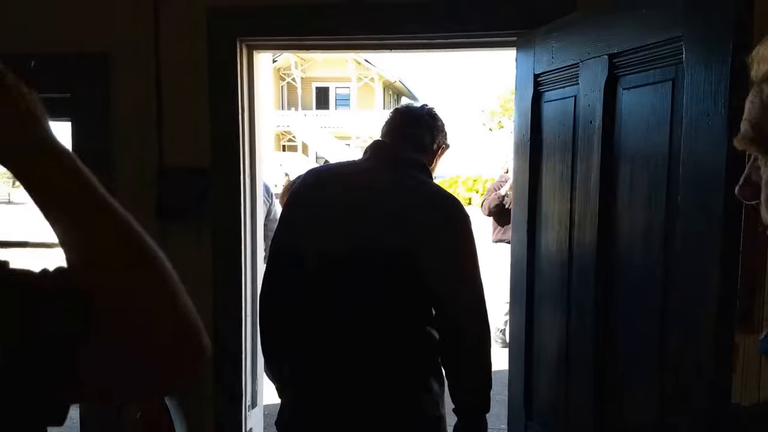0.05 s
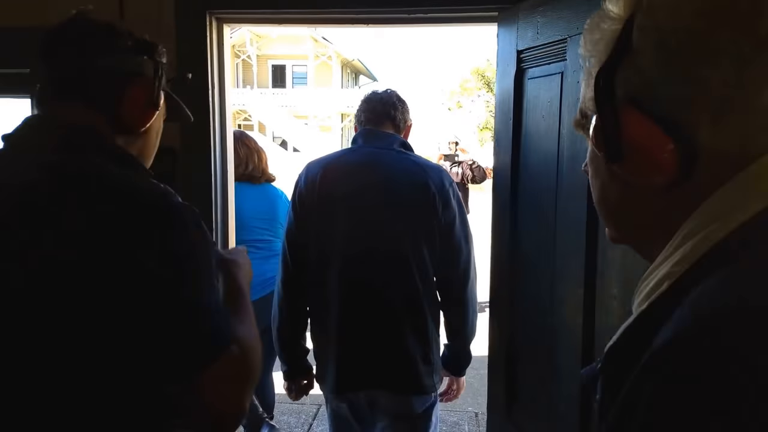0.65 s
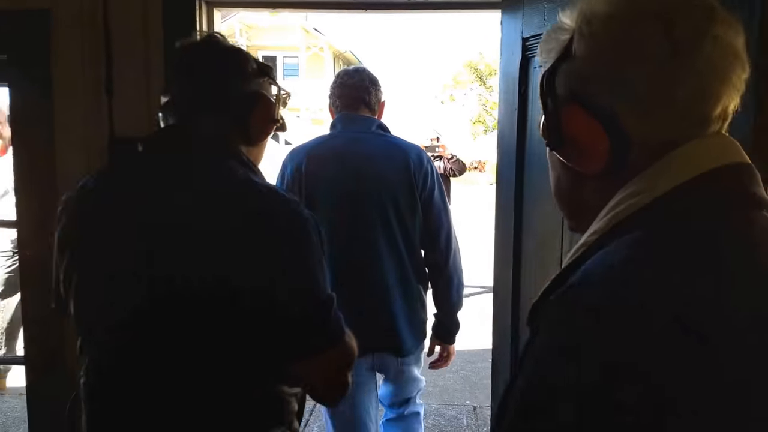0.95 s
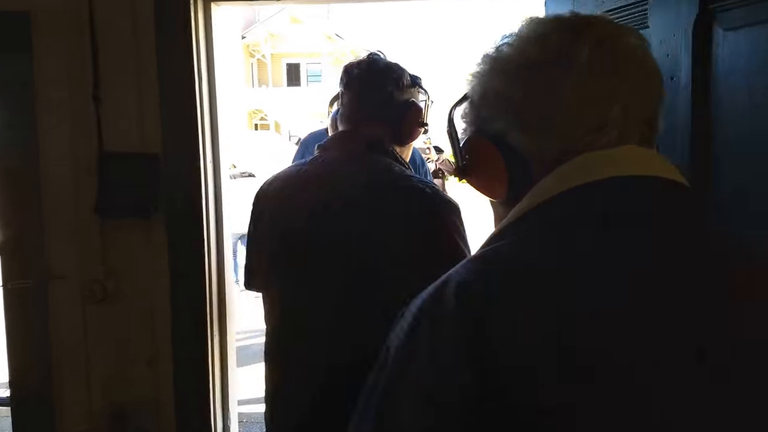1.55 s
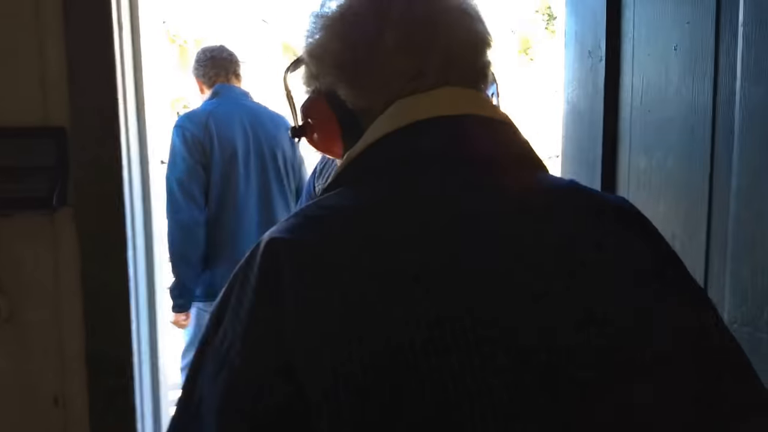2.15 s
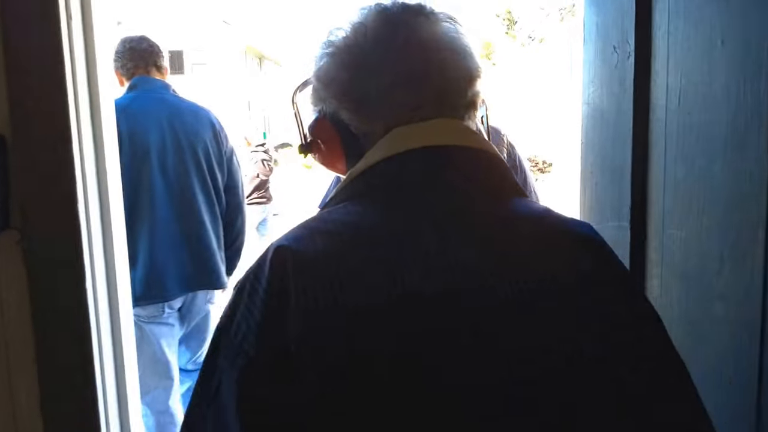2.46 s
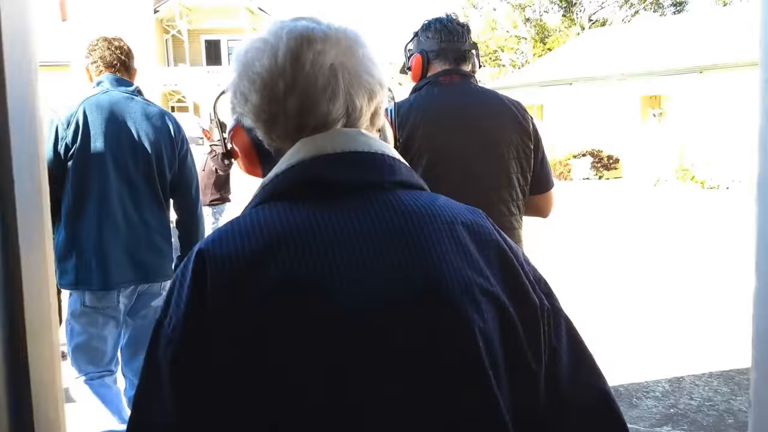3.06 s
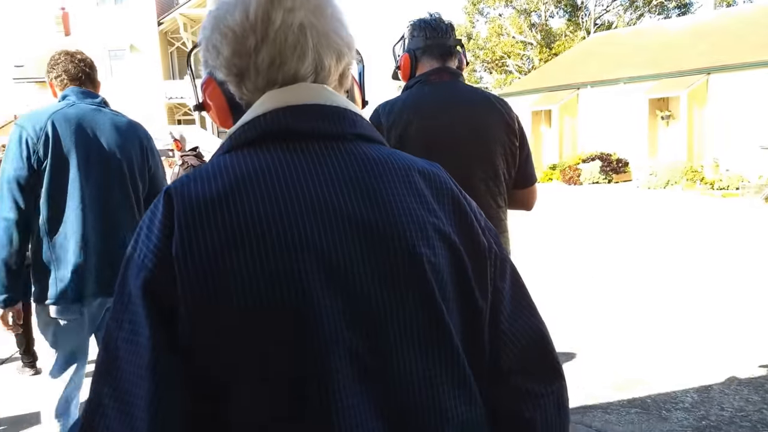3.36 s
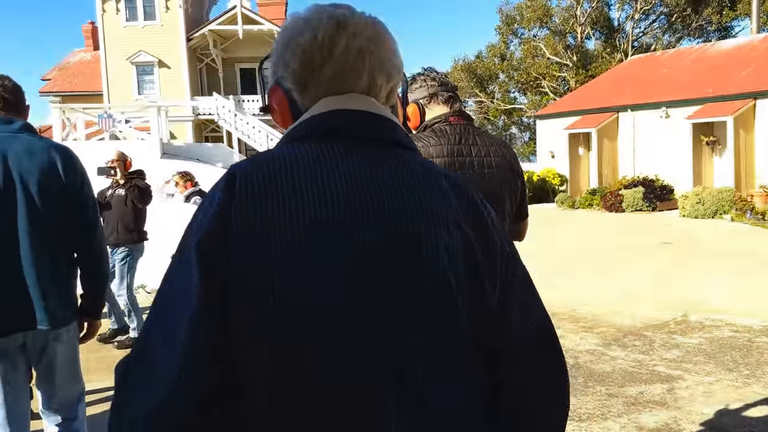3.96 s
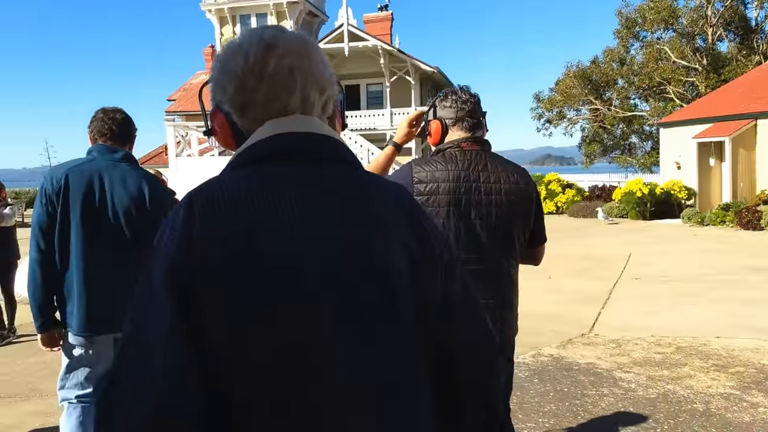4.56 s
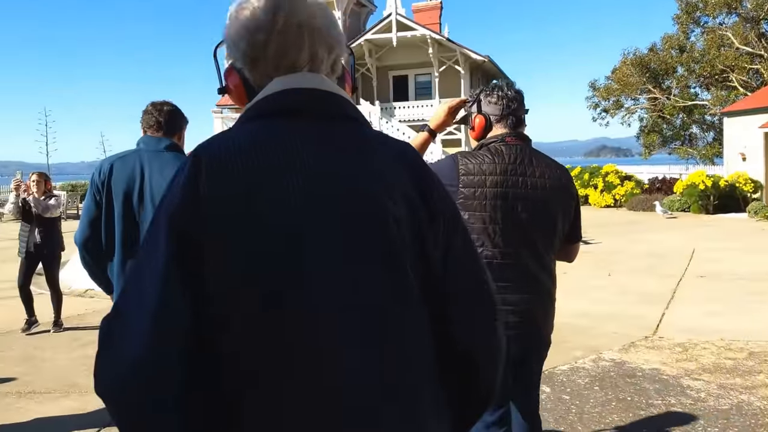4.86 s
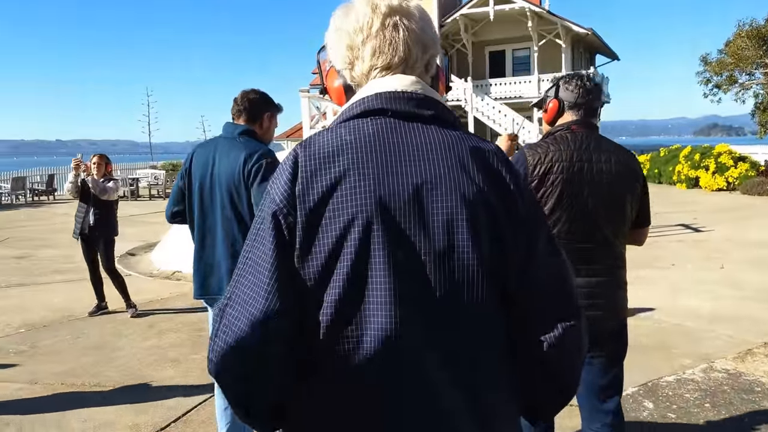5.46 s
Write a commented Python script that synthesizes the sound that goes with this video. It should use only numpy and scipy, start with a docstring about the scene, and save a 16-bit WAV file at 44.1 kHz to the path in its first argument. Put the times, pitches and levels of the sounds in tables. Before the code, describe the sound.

Loud, low compressor thumps and puffs of air pulse over an engine's drone, growing duller on the way out of an engine house.

```python
"""A slow air compressor thumps in an engine house, driven by a roaring diesel engine.
Its piston pushes and pulls, and each stroke sets the pipes and the building booming.
The engine's four cylinders hum and clatter; its bass swells under the load of every stroke.
Once a turn air hisses through the valves, at times with a ringing spit, and the pipes knock.
The listener walks from the room through the door into the yard, where the treble fades."""
import sys
import numpy as np
from scipy import signal
from scipy.fft import rfft, irfft, next_fast_len
from scipy.io import wavfile
from scipy.ndimage import uniform_filter1d

SR = 44100
rng = np.random.default_rng(int(sys.argv[2]) if len(sys.argv) > 2 else 0)


def transcribe(u):
    """Save the signal u as a 16-bit wav file named by the first command-line argument.

    u: samples, shape (n,) or (channels, n), limited to [-1, 1]; the rate is SR.
    q: integer samples, one column per channel.
    """
    v = np.clip(np.atleast_2d(u).T, -1, 1)
    q = np.round(v * 32767).astype(np.int16)
    wavfile.write(sys.argv[1], SR, q)


N = 247401
TIME = np.arange(N) / SR
TURN_S = 0.20775   # one turn of the compressor
CYCLE_HZ, CYLINDERS = 9.425, 4   # each cylinder fires once in an engine cycle


# the piston's push and pull: (time into the turn [s], level [dB])
PISTON_STROKES = [(0.0544, 2.5), (0.163, 1.5)]
# notes at which the pipes and building ring; narrow ones ring longest: (pitch [Hz], width [Hz],
# indoor level [dB], outdoor level [dB], travel time to the listener [s], its change on the walk [s/s])
RESONANCES = [(58, 21, -25.7, -39, 0.0111, .0015), (66.4, 11.2, -27.9, -33.5, 0.0104, .001),
              (79.8, 33, -25.5, -28.7, 0.0141, -.0014), (102.2, 2.8, -28, -41, .0196, .0001),
              (118.4, 4.4, -24.3, -20.3, 0.0054, -.0003), (127, 17, -22, -23, 0.01043, 0),
              (137, 7.3, -25, -32, 0.00932, .0003), (171.6, 10, -30.3, -37, .0164, 0.0049),
              (177.5, 2.9, -35.9, -42, .0413, -.0002), (224.8, 6.2, -26, -28.5, 0.00881, .0001),
              (236, 4.14, -31, -25, 0.00975, 0), (246, 2.12, -25, -37.5, 0.01062, .0001),
              (255.2, 4.1, -33, -27.5, 0.01064, .0002), (317.4, 3, -39.5, -37, .0165, -.0002),
              (442.6, 3.8, -41, -24, .0376, 0), (462.6, 6, -41, -24.5, .0014, 0),
              (348.5, 11, -34.5, -36, 0.0151, 0)]
# strength of the thumps along the walk: (time [s], level [dB])
THUMP_LEVELS = [(0, -0.5), (0.8, 0), (1.75, 0), (2.7, 0.2), (4, 0), (5.6, -1.8)]

def thumps(treble_db, uneven_db=0.5, shade_from_hz=235, shade_per_octave=0.73):
    """Piston strokes ring the pipes and the building; the mix of notes changes at the door."""
    level_db, = in_time(THUMP_LEVELS)
    run_in = round(4 * TURN_S * SR)   # the machine is already running at the start
    pushes, out = np.zeros(N + run_in), np.zeros((2, N))
    for (s, db), sign in zip(PISTON_STROKES, (1, -1)):
        at = (np.arange(s, len(pushes) / SR, TURN_S) * SR).astype(int)
        pushes[at] = sign * from_db(db + uneven_db * rng.standard_normal(64)[:len(at)])
    for k, (hz, width, indoor_db, outdoor_db, travel_s, growth) in enumerate(RESONANCES):
        r, w = np.exp(-np.pi * width / SR), 2 * np.pi * hz / SR
        ring = signal.lfilter([1, -r * np.cos(w)], [1, -2 * r * np.cos(w), r * r], pushes)
        # each note reaches the walking listener by its own path
        late_s = travel_s + growth * TIME
        ring = np.interp(TIME - late_s, np.arange(-run_in, N) / SR, ring)
        outside = outdoors(lead_s=0.25 if hz > 200 else 0)   # higher notes change sooner
        place_db = indoor_db + (outdoor_db - indoor_db) * outside
        shade_db = treble_db * shade_per_octave * max(np.log2(hz / shade_from_hz), 0)
        ring = ring * (-1) ** k * from_db(place_db + shade_db + level_db)
        # each note meets the two microphones a little differently
        lean_db = 1.4 * drift(0.88)
        right = np.interp(TIME - 0.0004, TIME, ring)
        out += [ring * from_db(lean_db), right * from_db(-lean_db)]
    return above(below(out, 800), 50, order=4)   # air pulses are soft-edged


# the engine's strongest tones: (pitch [multiples of the firing rate])
HUM_MULTIPLES = [3, 4, 5, 9, 10, 12, 20, 22]
# each tone forms a standing wave, a fixed pattern of loud and quiet spots: (level at one loud spot [dB],
# time it is passed [s], time between loud spots [s], fade away from it [dB/s])
HUM_SPOTS = [(-35, 5.0, 33, 0.6), (-31, 3.3, 3.14, -0.5), (-34, 4.72, 2.5, 2), (-34.5, 1.06, 2.1, 1.5),
             (-31, 3.12, 2.9, 4.5), (-30.5, 2.1, 1.62, 5), (-36, 0.87, 1.39, 1.5), (-36, 0.75, 1.5, 5)]

def hum(dip_depth=0.66, rough_db=2.5, jitter_s=0.000061, spread_rad=0.57):
    """Engine tones, rough from uneven burning, swell and fade as the listener walks through them."""
    out, time = np.zeros((2, N)), TIME + jitter_s * drift(22)
    for multiple, (db, loud_s, spacing_s, fade_db_per_s) in zip(HUM_MULTIPLES, HUM_SPOTS):
        away_s = abs(TIME - loud_s)
        standing = 1 - dip_depth * np.sin(np.pi * away_s / spacing_s) ** 2
        phase = 2 * np.pi * (multiple * CYLINDERS * CYCLE_HZ * time + rng.random())
        stereo_shift = spread_rad * drift(1.0) * [[.5], [-.5]]
        gain = from_db(db - fade_db_per_s * away_s + rough_db * drift(30))
        out += np.sqrt(2) * standing * gain * np.sin(phase + stereo_shift)
    return out


# tone colour of the firing cylinders: (pitch [Hz], level [dB per Hz])
FIRING_COLOUR = [(115, -53), (165, -54), (200, -52.5), (280, -66), (340, -56), (420, -60), (480, -56.5),
                 (550, -60), (780, -58.5), (1050, -60.5), (1500, -55), (2000, -81), (4000, -104)]

def firing(odd_db=-2, firing_db=1, wobble_s=0.00012, patterns=8):
    """The cylinders repeat one echoing cycle, whose pattern changes along the walk."""
    size = round(SR / CYCLE_HZ)
    harmonic = np.arange(size // 2 + 1)
    stress = from_db(odd_db * (harmonic % 2) + firing_db * (harmonic % CYLINDERS == 0))
    stress[CYLINDERS * np.array(HUM_MULTIPLES)] = 0   # hum() plays these tones
    position = (TIME + wobble_s * drift(3.03)) * CYCLE_HZ * size % size
    walked = TIME / TIME[-1] * (patterns - 1)
    out = np.zeros((2, N))
    for step in range(patterns):
        cycle = irfft(diffuse(FIRING_COLOUR, size) * stress, size)
        nearness = np.sqrt(np.maximum(1 - abs(walked - step), 0))
        out += nearness * np.array([np.interp(position, np.arange(size), side) for side in cycle])
    return above(out, 140)


# tone colour of the engine's roar: (pitch [Hz], level [dB per Hz])
ROAR_COLOUR = [(120, -52), (160, -54), (200, -51.5), (290, -60.5), (400, -58.5), (540, -62), (680, -55.5),
               (900, -60.5), (1450, -58.5), (1900, -69.5), (2300, -68.5), (2850, -62), (3600, -76.5),
               (5000, -99)]

def roar(throb_depth=0.056):
    """Burning fuel and gears make a noise that throbs a little at each firing."""
    throb = 1 + throb_depth * np.cos(2 * np.pi * CYLINDERS * CYCLE_HZ * TIME)
    return above(noise(ROAR_COLOUR) * throb, 150)


# the engine along the walk: (time [s], level of the middle notes [dB], level of the high clatter [dB])
ENGINE_LEVELS = [(0, 3, 0), (0.8, 3.5, 0.6), (1.35, 1, 0.6), (1.7, 3, -2.5), (2.2, 2, 0), (2.65, 5, 1.5),
                 (3.3, -0.5, -1), (4.1, 3, -2.5), (4.8, 4, -4), (5.6, 3.5, -8)]

def through_door(x, bass_db=0.5, bass_hz=270, clatter_hz=620):
    """Bass bends round the door frame at a steady level, while higher notes are partly blocked."""
    middle_db, clatter_db = in_time(ENGINE_LEVELS)
    bass, low = below(x, bass_hz), below(x, clatter_hz)
    return bass * from_db(bass_db) + (low - bass) * from_db(middle_db) + (x - low) * from_db(clatter_db)


def under_load(x, deep_depth=0.5, upper_depth=0.072, indoor_peak_s=0.098, outdoor_peak_s=0.077):
    """Each piston stroke loads the engine, so its bass swells and sinks; the upper bass follows late."""
    peak_s = indoor_peak_s + (outdoor_peak_s - indoor_peak_s) * outdoors()
    stroke_hz = len(PISTON_STROKES) / TURN_S
    load, late_load = (np.cos(2 * np.pi * stroke_hz * (TIME - peak_s - lag_s)) for lag_s in (0, 0.025))
    deep = below(x, 160)
    upper = below(x, 290) - deep
    return x + deep * deep_depth * load + upper * upper_depth * late_load


# one puff of air each turn: (time of the peak [s], hiss level [dB], chuff level [dB])
PUFFS = [(-0.146, 0, 2), (0.06, 0.6, 1.5), (0.267, 0, 2), (0.476, 1.7, -3), (0.681, -0.2, 3.5),
         (0.889, 0.2, 3), (1.098, -1, 1), (1.308, -1, -12), (1.511, -0.2, 5.5), (1.72, -2.5, -10),
         (1.929, -0.4, 4), (2.139, -2, -7), (2.348, -1.5, 5), (2.554, -0.5, 6), (2.756, -1, -1),
         (2.965, 1, 8), (3.174, 0.6, 5.5), (3.385, 0.6, 3.5), (3.587, -1, 1), (3.797, -0.8, 4.5),
         (4.009, -0.5, -0.5), (4.213, -0.5, 1), (4.42, -0.7, 3.5), (4.638, -0.5, -16), (4.835, -0.5, -6),
         (5.049, 0, -4), (5.261, -1.3, -7), (5.467, -0.5, -0.5)]
# tone colours of the valves' hiss and the air pipe's chuff: (pitch [Hz], level [dB per Hz])
HISS_COLOUR = [(600, -66.5), (1400, -66.5), (2100, -59.5), (2800, -59.5), (3600, -59), (5000, -64.5),
               (6500, -64), (8000, -70.5), (11000, -73.5), (15000, -78.5)]
CHUFF_COLOUR = [(400, -72), (590, -64), (675, -58.5), (780, -66), (950, -65), (1150, -59.5), (1450, -61.5),
                (1900, -71.5), (3000, -93.5)]

def valves(treble_db, hiss_db=1.17, chuff_db=-0.5):
    """Each puff is a bright, sputtering hiss over a hollow chuff of the air pipe."""
    times_s, hisses_db, chuffs_db = np.transpose(PUFFS)
    flow = np.sqrt(puff_power(times_s, hisses_db) + spit_power(swell_s=0.0052, decay_s=0.013))
    flow *= from_db(0.73 * drift(45))   # sputter
    hiss = noise(HISS_COLOUR) * flow * from_db(hiss_db + treble_db + 0.5 * drift(150))
    # the air swallows the highest part of each tail first
    swell = flow ** 2 / np.mean(flow ** 2)
    dull = below(hiss, 9000)
    hiss = dull + (hiss - dull) * (swell / 2) ** 0.16
    pipe_flow = np.sqrt(puff_power(times_s, chuffs_db))
    chuff = noise(CHUFF_COLOUR) * pipe_flow * from_db(chuff_db + 2.5 * drift(60))
    return hiss + chuff


def puff_power(times_s, levels_db, swell_s=0.038, decay_s=0.089):
    """Each puff of air swells and dies away in the room; the tails overlap."""
    return sum((from_db(db) * burst(s, swell_s, decay_s, tail_shape=1.45)) ** 2
               for s, db in zip(times_s, levels_db))


# short spits of air: (time [s], level [dB])
AIR_SPITS = [(0.885, -8), (0.915, -3), (1.11, -2), (1.935, -6), (2.155, -2), (2.36, 0), (2.77, -5),
             (3.195, 0), (3.592, 1), (3.805, -1), (4.22, -5)]

def spit_power(swell_s, decay_s):
    """Some puffs break out with a sudden spit of air."""
    return sum((from_db(db) * burst(s, swell_s, decay_s)) ** 2 for s, db in AIR_SPITS)


# tone colour of the ringing valve plates: (pitch [Hz], level [dB per Hz])
PLATE_COLOUR = [(2600, -125), (3200, -70), (3290, -53), (3380, -67), (3560, -56), (3700, -63), (3850, -59),
                (4600, -125)]

def valve_plates(treble_db):
    """Each spit of air sets the valve plates rasping, with a metallic ring."""
    ringing = np.sqrt(spit_power(swell_s=0.02, decay_s=0.07))
    return noise(PLATE_COLOUR) * ringing * from_db(0.6 * treble_db)


# hollow knocks in the pipes: (time [s], pitch [Hz], level [dB])
PIPE_KNOCKS = [(0.08, 662, -24), (0.277, 668, -22.5), (0.651, 670, -28), (1.07, 664, -29),
               (1.305, 674, -26), (2.55, 660, -28), (2.675, 690, -26), (2.95, 370, -23), (2.985, 650, -28),
               (3.176, 673, -31), (3.495, 390, -23.5), (3.784, 676, -27), (4.485, 390, -25),
               (5.075, 670, -29)]

def knocks(width_hz=35, swell_s=0.018, decay_s=0.034, rattle_db=-7):
    """A short rattle rings a hollow note in the pipes, blurred by the room."""
    out, r = np.zeros(N), np.exp(-np.pi * width_hz / SR)
    for s, hz, db in PIPE_KNOCKS:
        rattle = rng.standard_normal(N)
        ring = signal.lfilter([1, 0, -1], [1, -2 * r * np.cos(2 * np.pi * hz / SR), r * r], rattle)
        ring /= np.sqrt(uniform_filter1d(ring ** 2, size=1500) + 1e-9)   # evened, so every knock rings
        out += ring * burst(s, swell_s, decay_s) * from_db(db)
    dull = below(out, 1070)
    return dull + (out - dull) * from_db(rattle_db)


# tone colour of the rushing air: (pitch [Hz], level [dB per Hz])
RUSH_COLOUR = [(1000, -76), (1800, -60), (2600, -63.5), (3500, -63.5), (5000, -69), (6500, -70.5),
               (8000, -78), (11000, -83.5), (15000, -101)]

def air_rush(treble_db):
    """An unbroken rush of air lies behind the puffs and fades in the yard."""
    return noise(RUSH_COLOUR) * from_db(0.95 * treble_db)


# tone colour of the building's rumble: (pitch [Hz], level [dB per Hz])
RUMBLE_COLOUR = [(20, -100), (45, -75), (85, -68), (120, -60), (160, -62), (250, -87), (600, -140)]

def rumble():
    """The building rumbles faintly under everything."""
    return noise(RUMBLE_COLOUR)


# how alike the two microphones hear the room: (pitch [Hz], likeness [-1 opposite to 1 same])
STEREO_LIKENESS = [(30, -0.45), (70, -0.095), (150, 0.023), (300, 0.74), (600, 0.73), (1100, 0.49),
                   (1600, -0.29), (15000, 0.022)]

def diffuse(colour, size):
    """Random stereo spectrum of an echoing sound that repeats after `size` samples."""
    hz = np.arange(size // 2 + 1) * SR / size
    mid, side = rfft(rng.standard_normal((2, size)))
    alike = np.clip(at_hz(STEREO_LIKENESS, hz), -1, 1)
    pair = np.sqrt(1 + alike) * mid + np.sqrt(1 - alike) * side * [[1], [-1]]
    return pair * from_db(at_hz(colour, hz)) * np.sqrt(SR) / 2


def noise(colour):
    """Steady stereo noise of a given tone colour."""
    size = next_fast_len(N)
    return irfft(diffuse(colour, size), size)[:, :N]


def outdoors(lead_s=0, door_s=2.91, passage_s=0.5):
    """Goes from 0 in the engine house to 1 in the yard."""
    return np.clip((TIME + lead_s - door_s) / passage_s + .5, 0, 1)


def burst(s, swell_s, decay_s, tail_shape=1):
    """Swells to 1 at time s and dies away; a tail shape above 1 cuts the tail shorter."""
    before, after = np.maximum(s - TIME, 0), np.maximum(TIME - s, 0)
    fall = (before / swell_s) ** 2 + (after / decay_s) ** tail_shape
    return np.exp(-np.minimum(fall, 20))


def drift(rate):
    """A random wander of about 1 either way, with `rate` new values a second."""
    knots = rng.standard_normal(4096)
    return np.interp(TIME * rate, np.arange(len(knots)), knots) * np.sqrt(3 / 2)


def below(x, edge_hz):
    """The part of a sound under a given pitch."""
    return signal.sosfiltfilt(signal.butter(2, edge_hz, fs=SR, output="sos"), x)


def above(x, edge_hz, order=6):
    """The part of a sound over a given pitch; a higher order cuts more steeply."""
    return signal.sosfilt(signal.butter(order, edge_hz, "high", fs=SR, output="sos"), x)


def from_db(db):
    """Turn decibels into a volume factor."""
    return 10 ** (np.asarray(db) / 20)


def in_time(rows):
    """One curve over time for each level column of a table."""
    s, *columns = np.transpose(rows)
    return [np.interp(TIME, s, column) for column in columns]


def at_hz(points, hz):
    """Read between a table's pitches, giving each octave equal room."""
    known_hz, values = np.transpose(points)
    return np.interp(np.log(np.maximum(hz, 1)), np.log(known_hz), values)


# how much treble reaches the listener; each sound follows it by its own share: (time [s], level [dB])
TREBLE_ON_WALK = [(0, -1), (1.45, 0), (1.72, -0.5), (2.0, 0.1), (2.6, 1.6), (3.05, -1.4), (3.6, -1.5),
                  (4.45, -6), (5.6, -14)]

def scene():
    """Both machines, heard along the walk; outdoors the highest hiss fades most."""
    treble_db, = in_time(TREBLE_ON_WALK)
    engine = under_load(through_door(firing() + roar()) + hum() + rumble())
    air = valves(treble_db) + air_rush(treble_db)
    dull = below(air, 7500)
    air = dull * from_db(-0.14 * treble_db) + (air - dull) * from_db(0.33 * treble_db)
    return thumps(treble_db) + engine + air + knocks() + valve_plates(treble_db)


# how much of the other microphone is taken away: (pitch [Hz], share [0 to 1])
WIDENING = [(200, 0.098), (600, 0.28), (1100, 0.62), (2300, 0.59), (7000, 0.34), (9000, 0.87),
            (14000, 0.33)]
# which side is louder: (pitch [Hz], left minus right [dB])
SIDE_BALANCE = [(40, -12), (100, -3), (400, -0.5), (1000, -0.5), (1600, -2), (5000, -3), (8000, -1),
                (15000, 1)]

def record(dry, mic_delay_s=0.000428, cutoff_hz=15500):
    """Taking a delayed copy of each side from the other widens the sound; the highest treble is cut."""
    size = next_fast_len(N + SR // 10)
    hz = np.arange(size // 2 + 1) * SR / size
    mics = rfft(dry, size)
    share = np.clip(at_hz(WIDENING, hz), 0, 1)
    other_side = np.exp(-2j * np.pi * hz * mic_delay_s) * mics[::-1]
    wide = (mics - share * other_side) / np.sqrt(1 + share ** 2)
    wide *= from_db(at_hz(SIDE_BALANCE, hz) * [[.5], [-.5]])
    low_pass = np.clip((cutoff_hz - hz) / 150 + .5, 0, 1)
    return irfft(wide * low_pass, size)[:, :N]


dry = scene()
out = record(dry)
transcribe(out)
```